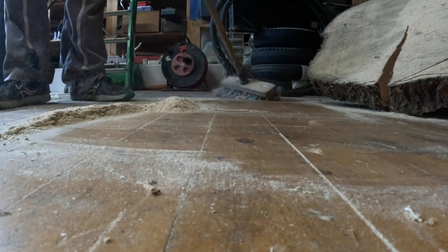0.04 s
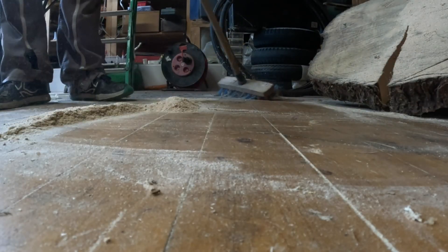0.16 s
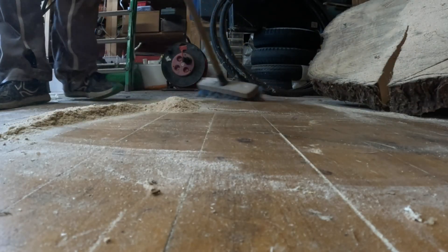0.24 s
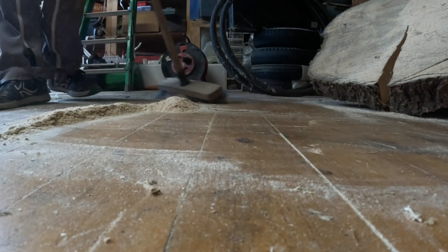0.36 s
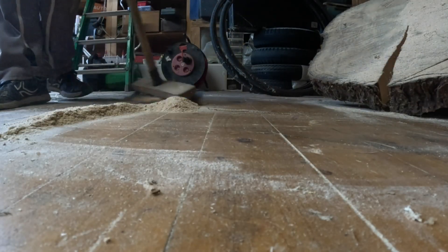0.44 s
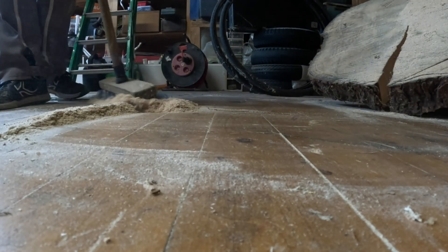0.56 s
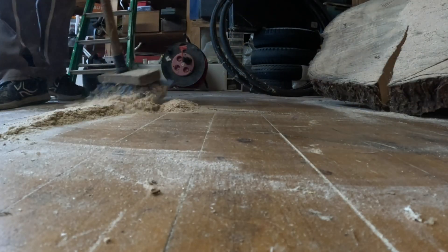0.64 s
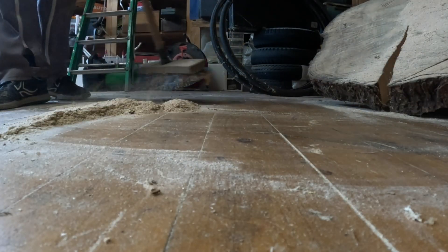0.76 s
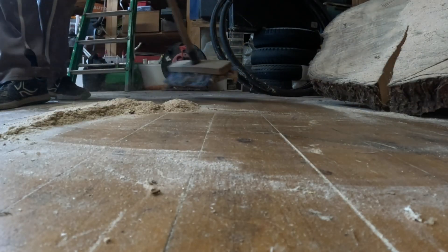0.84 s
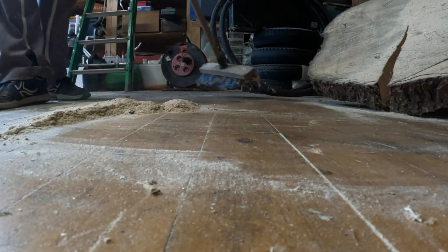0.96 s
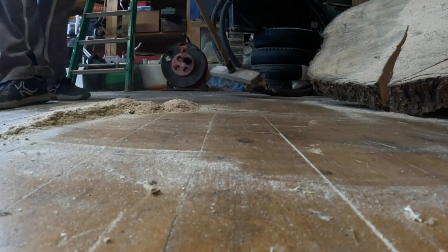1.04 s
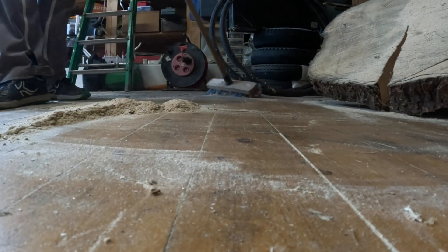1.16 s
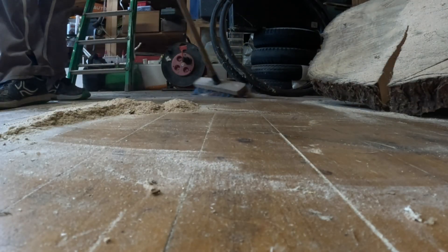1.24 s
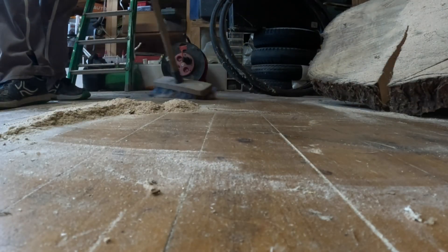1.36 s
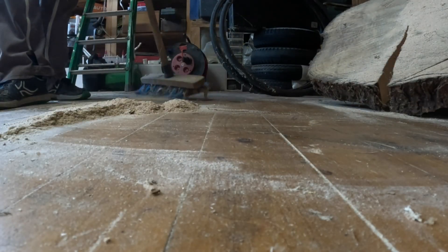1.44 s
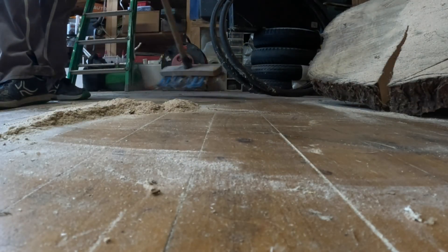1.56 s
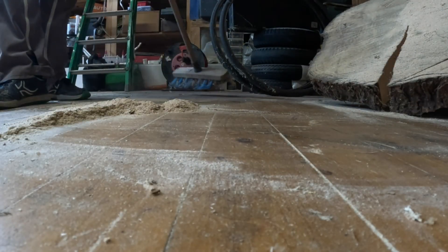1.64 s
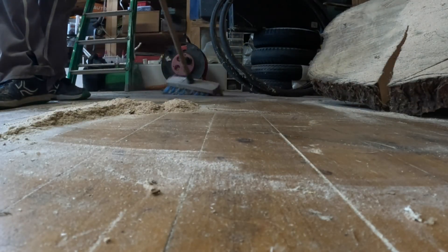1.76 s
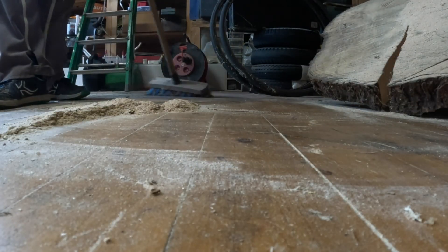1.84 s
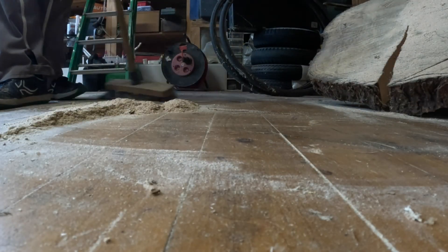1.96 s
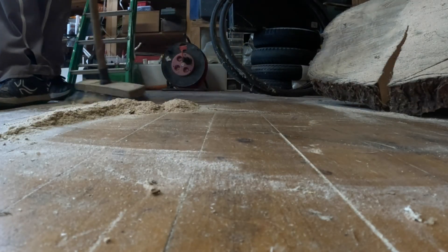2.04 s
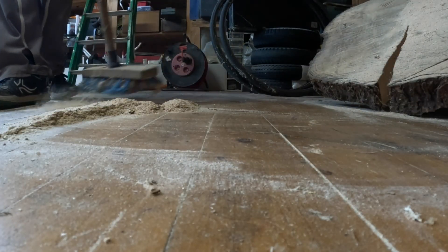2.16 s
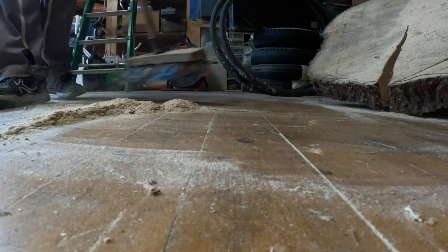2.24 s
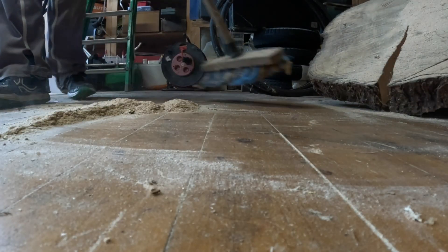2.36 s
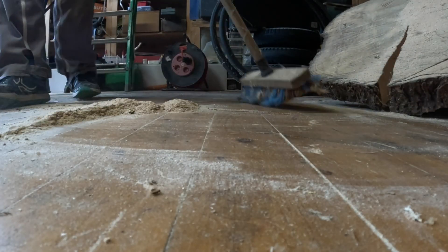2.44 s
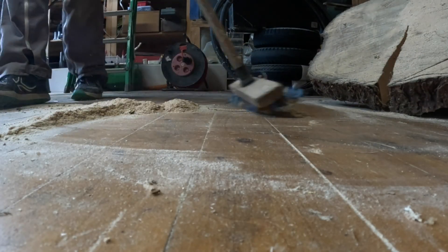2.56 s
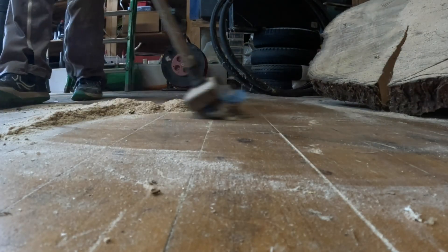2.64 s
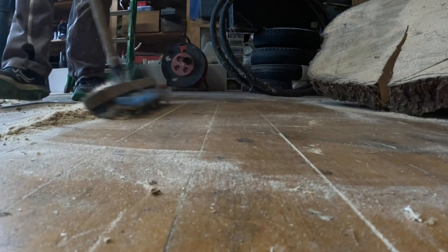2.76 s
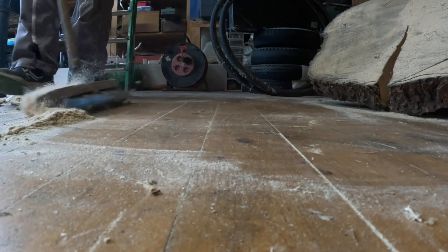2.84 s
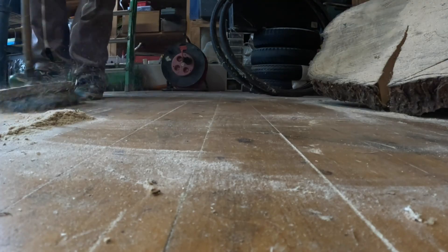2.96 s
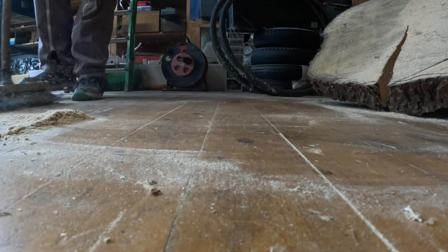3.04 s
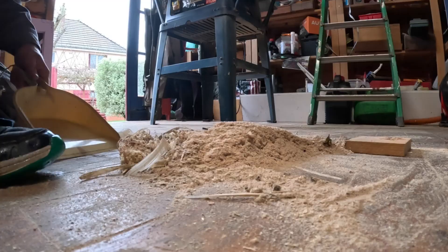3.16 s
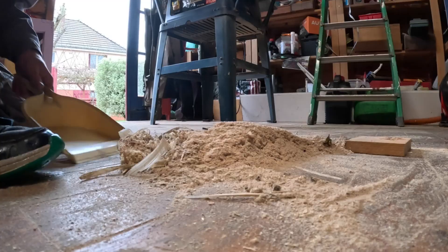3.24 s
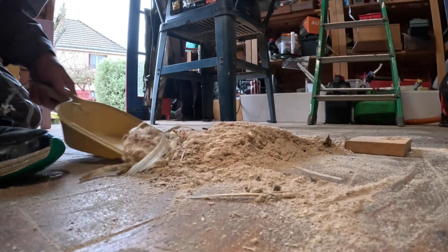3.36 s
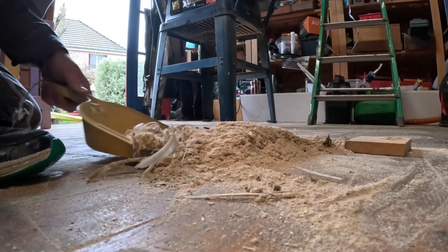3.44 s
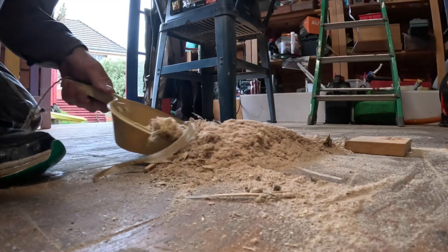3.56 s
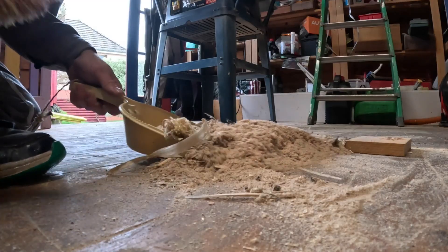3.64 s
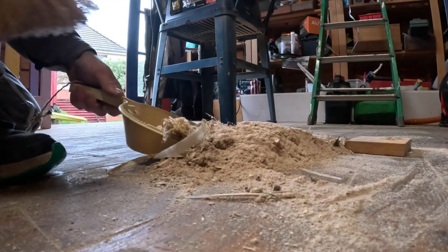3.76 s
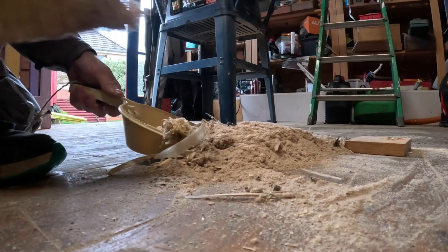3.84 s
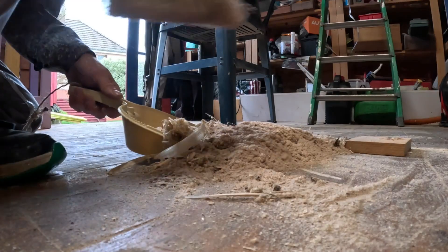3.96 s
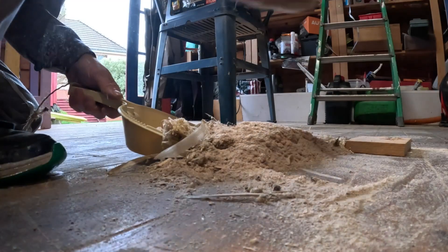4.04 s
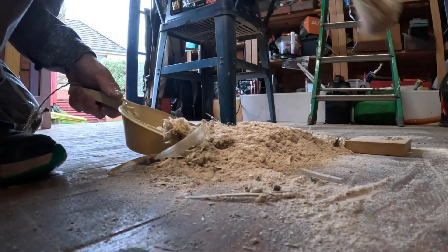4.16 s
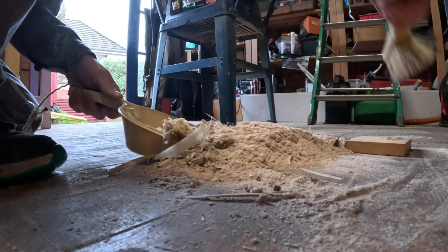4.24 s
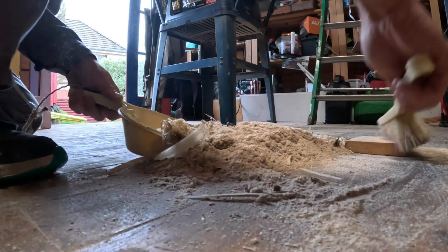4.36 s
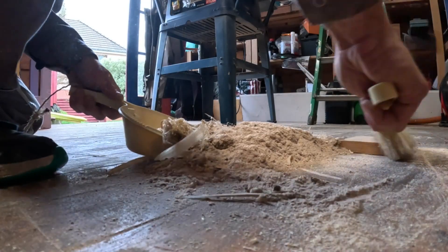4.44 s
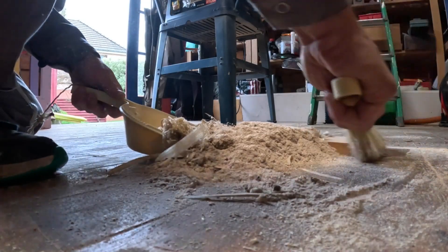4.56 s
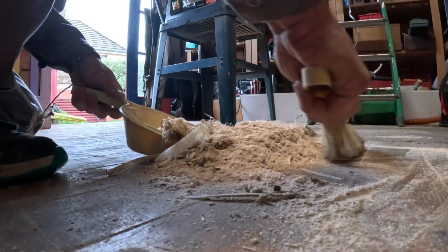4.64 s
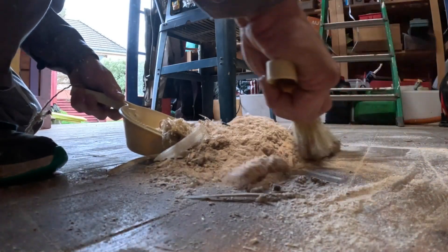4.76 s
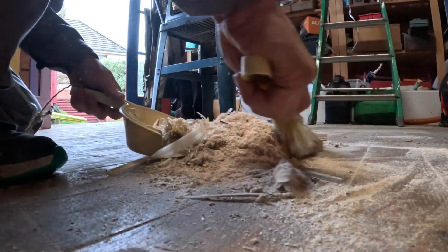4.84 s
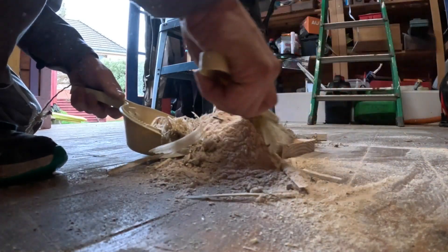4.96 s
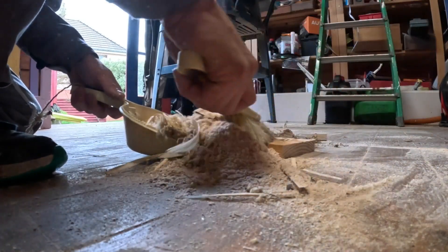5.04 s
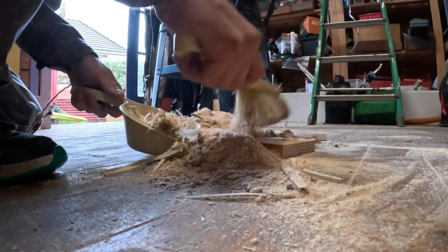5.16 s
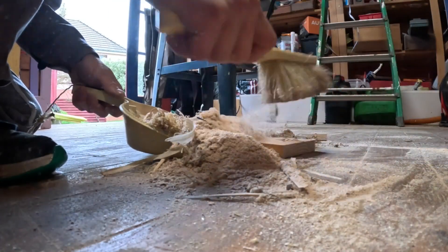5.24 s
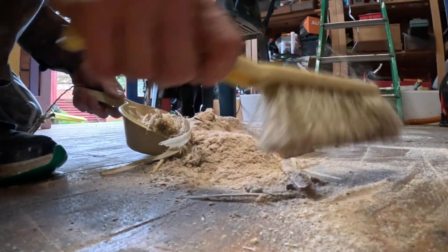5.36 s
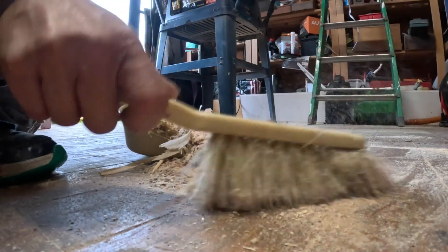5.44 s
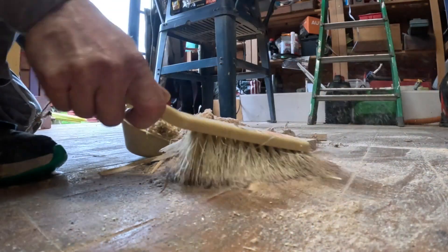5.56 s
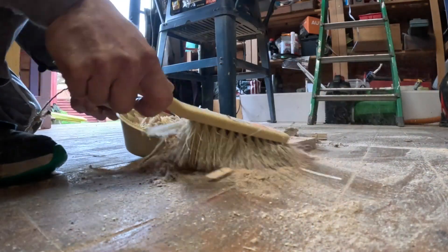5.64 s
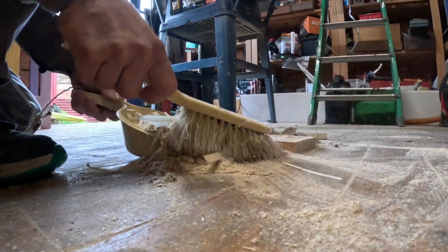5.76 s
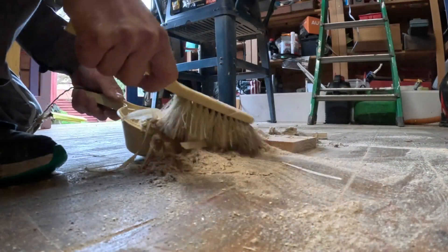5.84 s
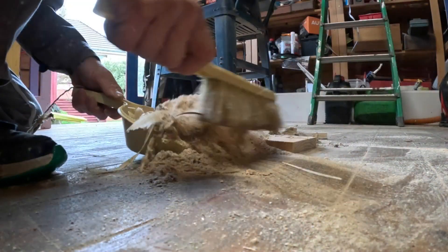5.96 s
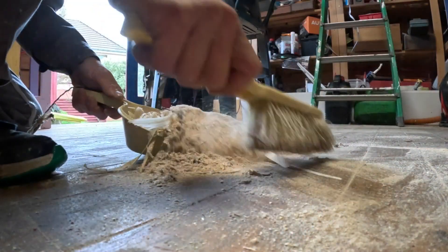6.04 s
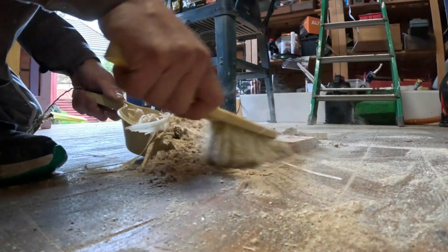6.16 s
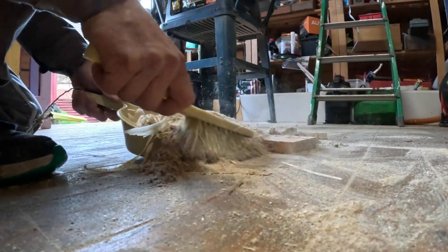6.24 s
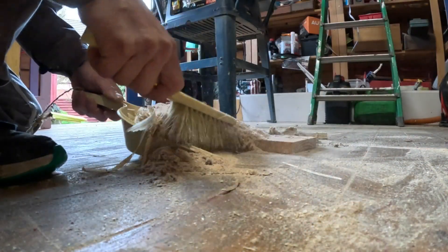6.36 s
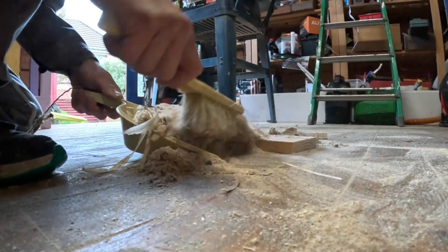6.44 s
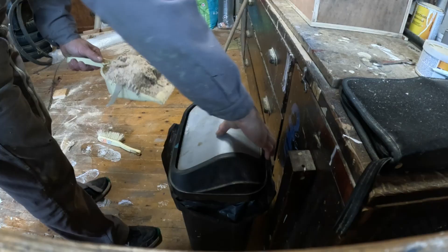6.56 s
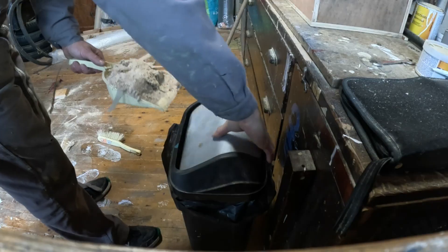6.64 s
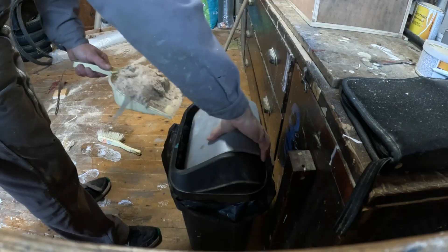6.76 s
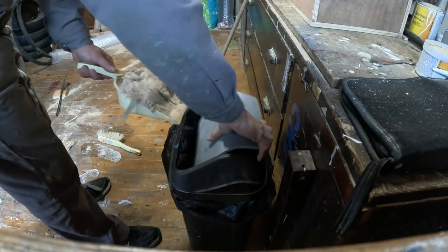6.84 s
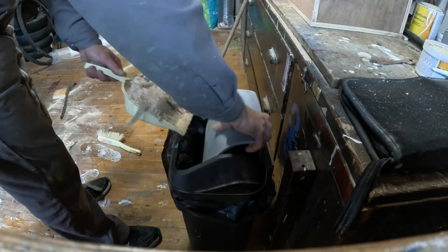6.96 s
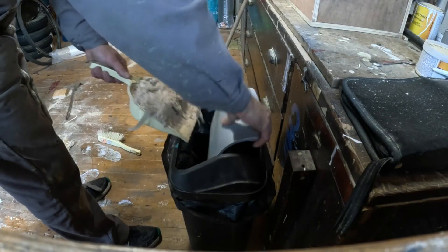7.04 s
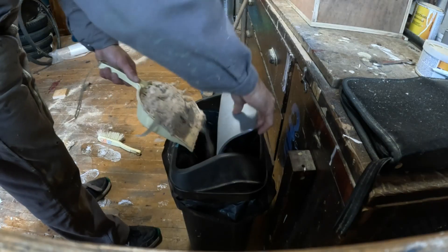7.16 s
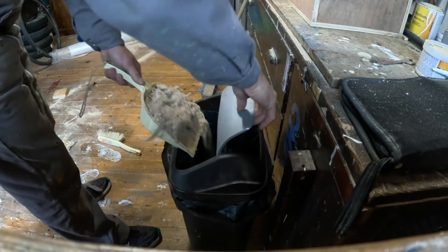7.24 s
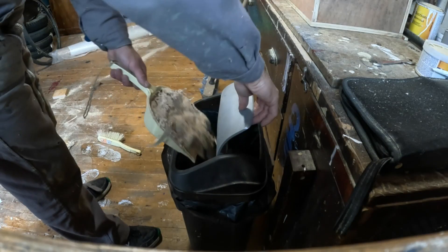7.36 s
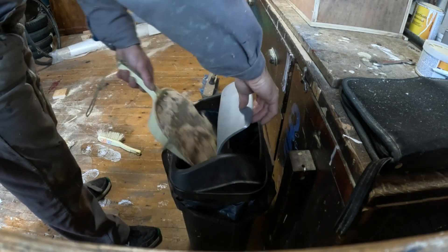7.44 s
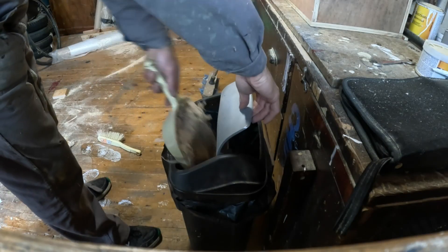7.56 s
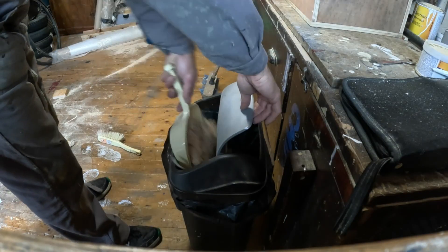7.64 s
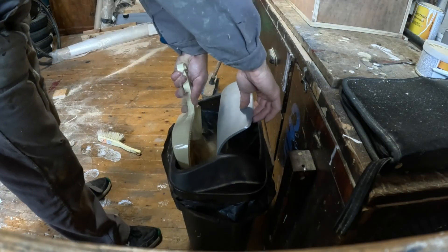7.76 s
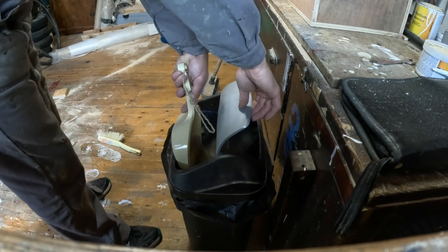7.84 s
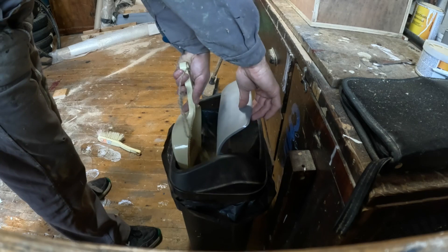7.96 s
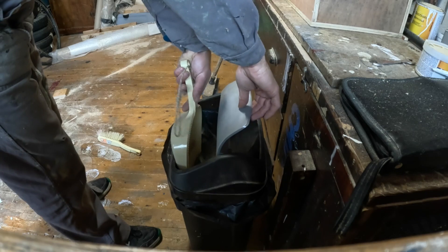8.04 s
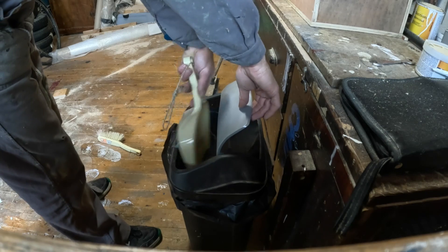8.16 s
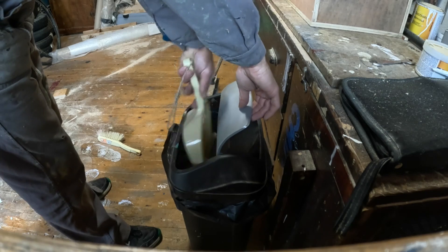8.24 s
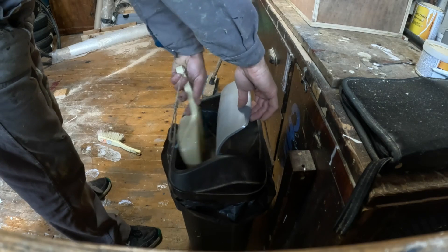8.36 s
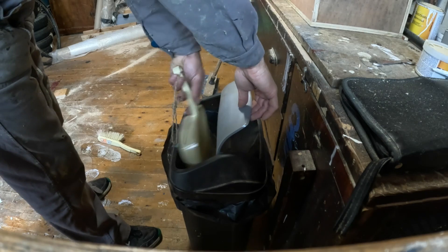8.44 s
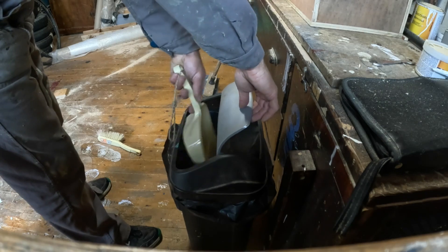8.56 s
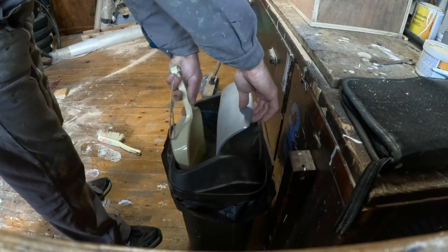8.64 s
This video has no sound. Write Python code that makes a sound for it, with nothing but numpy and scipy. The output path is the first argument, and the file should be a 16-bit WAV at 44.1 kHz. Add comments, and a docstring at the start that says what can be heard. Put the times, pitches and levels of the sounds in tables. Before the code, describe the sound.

Close to the floor in a small workshop, a stiff broom makes gritty swishing strokes with wooden catches and soft thuds. A plastic dustpan scrapes up loudly, squeaking and knocking the boards. A hand brush swishes sawdust in, shoving a juddering wood block. Brushing stops abruptly; a lid rubs and bumps, sawdust rustles into a lined bin, and the pan is rapped twice on the rim.

```python
"""A broom sweeps sawdust over workshop floorboards in four strokes, close to a microphone at floor level.
Then a plastic dustpan scrapes up to the heap and a hand brush fills it, shoving a wooden offcut along.
Brushing stops dead; a bin lid swings open, the sawdust slides in, and the pan is rapped twice on the rim.
Rubbing is noise made of tiny random slips and a blow is a push with dying chatter; each rings a filter
shaped like the thing touched, in one small room. The floor trembles and a steady background lies below."""
import sys
import numpy as np
from scipy import signal
from scipy.fft import rfft, irfft, next_fast_len
from scipy.io import wavfile
from scipy.ndimage import uniform_filter1d, minimum_filter1d

SR = 44100
rng = np.random.default_rng(int(sys.argv[2]) if len(sys.argv) > 2 else 0)


def file_out(sig):
    """Save sig as 16-bit WAV at sys.argv[1]."""
    # one column per channel
    cols = np.atleast_2d(sig).T
    # limit, then scale
    lim = np.clip(cols, -1, 1)
    pcm = np.round(lim * 32767).astype(np.int16)
    wavfile.write(sys.argv[1], SR, pcm)


N = 383475  # length in samples

# All levels in the tables are relative: each layer has a further gain where it is mixed.
# A movement speeds up (rise), carries on as its pressure changes (hold) and slows to rest (fall).

# broom strokes: t/s, rise/s, hold/s, fall/s, bristle level/dB, grit level/dB, head judder level/dB
BROOM_STROKES = [(0.0, 0.00057, 0.27, 0.16, -22.5, -16, -21), (0.945, 0.0054, 0.0055, 0.021, -34, -22, -28),
                 (0.93, 0.17, 0.041, 0.079, -22.5, -18.5, -27.5),
                 (1.52, 0.17, 0.13, 0.079, -22, -18.5, -29), (2.285, 0.16, 0.16, 0.21, -19, -16, -23),
                 (2.755, 0.012, 0.0058, 0.08, -28, -29, -23.5)]
# broom head catching on a board: t/s, grit level/dB, head level/dB, bristle level/dB (peaks)
BROOM_CATCHES = [(.088, -10, -7.5, -12.5), (.305, -11, -16.5, -17.5), (.962, -22, -19, -26),
                 (1.09, -11, -24, -19), (1.137, -25, -5.5, -25), (2.443, -4, -10.5, -13),
                 (2.513, -11, -10, -15), (2.642, -5.5, -10.5, -14), (2.785, -14, -29, -21.5)]
# spectrum of the bristle tips: f/Hz, level/dB
BRISTLE_TIPS = [(1120, -8), (1900, -0.5), (2640, -4.5), (3510, -1.5), (5460, -3.5), (7010, -2),
                (9490, -11.5), (11000, -21), (12500, -18.5), (14000, -31), (15000, -39)]
# spectrum of grit rolling under them: f/Hz, level/dB
GRIT = [(350, -12.5), (600, -8), (783, -7.5), (958, 2.5), (1120, -3.5), (1280, -4), (1700, -4.5),
        (2200, -26), (2860, -25), (4840, -120)]
# spectrum of the wooden head: f/Hz, level/dB
BROOM_HEAD = [(71, -19.5), (120, -1), (215, -6), (252, -6), (290, -7.5), (456, -10), (750, -13), (980, -38),
              (1650, -120)]
# resonances of the head: f/Hz, width/Hz, level over the spectrum/dB
HEAD_MODES = [(240, 36, -1), (335, 30, -3)]
# spectrum of stiff bristles springing: f/Hz, level/dB
STIFF_BRISTLES = [(800, -3.5), (1800, 4), (2600, 5), (4000, -4.5), (7000, -5.5), (10000, -23), (15000, -24)]
BEND_DB = 1.2  # how far the colour of the broom wanders as the bristles bend


def broom():
    """Thousands of bristles flick over the boards, rolling grit and shaking the wooden head."""
    tips, grit, head = body(BRISTLE_TIPS), body(GRIT), body(BROOM_HEAD, HEAD_MODES)
    hiss = rub(BROOM_STROKES, tips, per_s=5000, spread_db=-1.5, hiss=1.0, chatter_db=3.5, wet_db=4.5,
               left_db=3.5, sag_db_per_s=6.5, follow=0.82, cycles=1.0)
    crackle = rub(BROOM_STROKES, tips, per_s=500, spread_db=2.5, hiss=0, chatter_db=3, wet_db=-4,
                  left_db=2, sag_db_per_s=8, cycles=3)
    rolling = rub(BROOM_STROKES, grit, per_s=1000, spread_db=0.0, hiss=0.28, chatter_db=5.5, wet_db=5.0,
                  left_db=-1.0, sag_db_per_s=21.0, follow=0.76, level_column=5)
    judder = rub(BROOM_STROKES, head, per_s=400, spread_db=1.5, hiss=0.046, chatter_db=1.5, wet_db=3.5,
                 sag_db_per_s=13, follow=0.65, level_column=6)
    sweeping = amp(-2.0) * hiss + amp(-10) * crackle + amp(-4.5) * rolling + amp(-1.0) * judder
    grit_catch = strike(BROOM_CATCHES, grit, contact_s=.016, rattle=5, wet_db=-5)
    head_catch = strike(BROOM_CATCHES, head, contact_s=0.032, rattle=2.26, wet_db=-7.5, level_column=2)
    bristle_catch = strike(BROOM_CATCHES, body(STIFF_BRISTLES), contact_s=.016, rattle=8, wet_db=-3,
                           level_column=3)
    catches = amp(-3.5) * grit_catch + amp(-1.0) * head_catch + bristle_catch
    return wander(sweeping, BEND_DB) + catches


# broom and brush bristles touching down and flicking: t/s, rise/s, hold/s, fall/s, level/dB
FLICKS = [(.874, .012, .012, .06, -32.5), (1.5, .014, .004, .02, -38), (1.53, .02, .012, .034, -36.5),
          (2.27, .003, .0067, .1, -33), (2.311, .002, .004, .03, -30), (5.15, .021, .025, .025, -39),
          (5.92, .003, .004, .013, -32)]


def flicks():
    """Tufts of stiff bristles catch on the floor and spring free."""
    return rub(FLICKS, body(STIFF_BRISTLES), per_s=2900, spread_db=5, hiss=1.0, chatter_db=-1.5, wet_db=-1,
               left_db=0.5, sag_db_per_s=62, cycles=0.95)


# pushes of the dustpan: t/s, rise/s, hold/s, fall/s, lip scrape level/dB, board judder level/dB
PAN_PUSHES = [(3.249, 0.0023, 0.014, 0.026, -29, -54), (3.282, 0.0077, 0.036, 0.024, -14.5, -21),
              (3.322, 0.027, 0.091, 0.25, -8.5, -14), (3.565, 0.021, 0.11, 0.067, -17, -25)]
# light knocks of dustpan, offcut and brush handle: t/s, peak level/dB
CLACKS = [(3.25, -24), (3.291, -16), (3.434, 13.5), (3.482, -2), (3.5, 5.5), (3.519, 9), (3.584, 2),
          (3.706, -10), (3.877, -18), (4.548, -15), (4.599, -21), (4.701, -7), (4.831, -2), (5.502, -8),
          (5.685, -10), (5.898, -15), (6.096, -7), (6.158, -7.5), (6.197, -6.5), (6.457, -19)]
# spectrum of the plastic lip on the floor: f/Hz, level/dB
PAN_LIP = [(350, -17), (600, -13.5), (697, 1), (757, -12), (917, -2), (996, -3.5), (1420, -0.5),
           (2000, -10.5), (3060, -18), (4310, -23.5), (5660, -25), (11100, -47), (12500, -38), (15800, -91)]
# resonances of the pan: f/Hz, width/Hz, level over the spectrum/dB
PAN_MODES = [(552, 15, 3), (1080, 22, -7), (1377, 18, 1.5), (1530, 20, -4), (3050, 110, 4)]
# spectrum of grit crushed under the lip: f/Hz, level/dB
CRUSHED_GRIT = [(800, -10), (1800, 4), (3000, 4), (4400, -5.5), (5600, -10), (7500, -17), (10000, -22),
                (15000, -42)]
# spectrum of the floorboards: f/Hz, level/dB
BOARDS = [(40, -31), (100, -15), (155, -6), (200, -0.5), (245, 4), (330, -3), (480, -2), (650, -13),
          (1000, -15), (3000, -64), (10000, -100)]
# resonance of the floorboards: f/Hz, width/Hz, level over the spectrum/dB
BOARD_MODES = [(236.6, 18, 9)]
# spectrum of a light hard knock: f/Hz, level/dB
CLACK = [(100, -1.5), (300, 6.5), (700, -2.5), (1500, -2), (3000, -16), (6000, -20.5), (15000, -47)]


def dustpan():
    """The plastic lip chatters over the floor, crushing grit, ringing the pan and drumming the boards."""
    lip = rub(PAN_PUSHES, body(PAN_LIP, PAN_MODES), per_s=2400, spread_db=2, hiss=.25, chatter_db=1.8,
              wet_db=-8, left_db=1.3, sag_db_per_s=20, cycles=1.8)
    crunch = rub(PAN_PUSHES, body(CRUSHED_GRIT), per_s=600, spread_db=1.5, hiss=.1, chatter_db=2,
                 wet_db=-7, left_db=1.3, sag_db_per_s=30, cycles=2.5)
    drum = rub(PAN_PUSHES, body(BOARDS, BOARD_MODES), per_s=220, spread_db=3.0, hiss=0.055, chatter_db=-5.5,
               wet_db=-25.0, sag_db_per_s=23, follow=0.4, level_column=5)
    clacks = strike(CLACKS, body(CLACK, PAN_MODES), contact_s=.004, rattle=4, wet_db=-6)
    return amp(-2.5) * lip + amp(-13) * crunch + amp(-0.5) * drum + amp(-7.0) * clacks


# the lip squealing: t/s, length/s, first f/Hz, last f/Hz, level/dB
SQUEALS = [(3.274, 0.047, 1437, 1510, -15.5), (3.312, .04, 1548, 1394, -8),
           (3.345, 0.049, 1393, 1336, -10.5), (3.379, 0.038, 1380, 1526, -10),
           (3.642, 0.029, 1420, 1560, -27)]


def pan_squeals():
    """Slips of the lip lock loosely onto a gliding pitch with overtones, and the pan squeals."""
    out = np.zeros((2, N))
    for s, length, first_hz, last_hz, db in SQUEALS:
        t = np.arange(round(length * SR)) / SR
        wobble = 0.021 * unit(uniform_filter1d(rng.standard_normal(len(t)), 150))
        glide_hz = np.linspace(first_hz, last_hz, len(t)) * (1 + wobble)
        phase = 2 * np.pi * np.cumsum(glide_hz) / SR
        overtones = np.sin(np.outer(np.arange(2, 5), phase)).sum(0)
        squeal = amp(db) * np.hanning(len(t)) * (np.sin(phase) + amp(-17.5) * overtones)
        add(out, s, room(squeal, np.ones(1), wet_db=-21))
    return out


# hand brush strokes: t/s, rise/s, hold/s, fall/s, level/dB
BRUSH_STROKES = [(3.84, 0.088, 0.038, 0.05, -47), (4.21, 0.087, 0.21, 0.045, -49.5),
                 (4.43, 0.0032, 0.0031, 0.012, -27.5), (4.49, 0.091, 0.57, 0.057, -36),
                 (5.51, 0.093, 0.046, 0.28, -29), (5.672, 0.0056, 0.013, 0.021, -28),
                 (5.86, 0.011, .02, 0.68, -44), (6.19, 0.029, 0.041, 0.2, -35.5),
                 (6.32, 0.076, 0.24, .06, -48)]
# shavings and splinters pushed into the pan: t/s, rise/s, hold/s, fall/s, level/dB
SHAVINGS = [(5.05, 0.068, 0.035, 0.035, -31.5), (5.53, 0.07, 0.037, 0.18, -24.5),
            (5.8, 0.049, 0.11, 0.023, -29), (6.158, 0.0024, 0.0041, 0.019, -29),
            (6.185, 0.025, .01, 0.36, -32), (6.28, 0.061, 0.032, 0.056, -19), (6.4, .02, 0.032, 0.1, -50),
            (6.51, 0.022, 0.053, 0.02, -29)]
# chips of wood snapping: t/s, peak level/dB
SNAPS = [(3.2505, -27), (3.3212, -11), (3.5199, 7), (4.8307, -8), (5.686, -10), (5.712, -17), (6.095, -17),
         (6.164, -10), (6.457, -9.5), (6.985, -23), (7.007, -23), (7.7488, -17), (7.821, -23)]
# hard grains ticking off pan and bristles: t/s, peak level/dB
TICKS = [(2.048, -29), (3.3229, -5.5), (4.4318, -23), (4.944, -19.5), (5.0697, -21), (5.7492, -25),
         (5.779, -16.5), (5.812, -18.5), (6.5134, -39)]
# spectrum of the soft bristles: f/Hz, level/dB
SOFT_BRISTLES = [(1180, -51), (2000, -10), (2710, -6.5), (3080, -2.5), (4750, -8), (7510, -5), (8860, -8),
                 (14100, -22.5), (15000, -31), (15800, -47)]
# spectrum of splinters rasping: f/Hz, level/dB
SPLINTERS = [(290, -58), (500, -8), (638, -16), (873, -10), (991, -6), (1210, -4.5), (1610, -9),
             (1970, -10), (2340, -12.5), (5390, -25), (8000, -35), (10400, -63), (17600, -120)]
# spectrum of a snapping chip: f/Hz, level/dB
CHIP = [(500, 16.5), (1800, 16.5), (3200, 12.5), (6500, -1), (10000, -10), (15000, -46)]
# spectrum of a ticking grain: f/Hz, level/dB
HARD_GRAIN = [(1200, -25), (3000, 4), (6000, 4.5), (9500, 2), (15000, -35)]


def hand_brush():
    """Soft bristles hiss through the heap and flick grains; shavings rasp into the pan and dry chips snap."""
    swish = rub(BRUSH_STROKES, body(SOFT_BRISTLES), per_s=3500, spread_db=2.5, hiss=.7, chatter_db=2.5,
                wet_db=-3, left_db=1.3, sag_db_per_s=14, follow=0.89, cycles=1.5)
    rasp = rub(SHAVINGS, body(SPLINTERS), per_s=3600, spread_db=1.8, hiss=.5, chatter_db=1.5,
               wet_db=-3, sag_db_per_s=8, cycles=2)
    snaps = strike(SNAPS, body(CHIP), contact_s=0.0016, rattle=1.5, wet_db=-4)
    ticks = strike(TICKS, body(HARD_GRAIN), contact_s=.002, rattle=3, wet_db=-8)
    return amp(-2.5) * swish + amp(-6.5) * rasp + amp(-3.5) * snaps + amp(-1) * ticks


# shoves of the offcut: t/s, rise/s, hold/s, fall/s, scrape level/dB, board judder level/dB
OFFCUT_SHOVES = [(4.51, 0.11, 0.13, 0.17, -17, -6), (4.82, 0.056, 0.1, 0.02, -19.5, -7.5),
                 (4.98, 0.02, 0.037, 0.078, -35.5, -26), (5.65, 0.034, 0.0071, 0.14, -26.5, -15)]
# the offcut jolting as it sticks and lets go: t/s, peak level/dB
JOLTS = [(4.436, -13), (4.463, -15), (4.547, 1.5), (4.561, -1.5), (4.601, 5), (4.612, 5), (4.622, 0),
         (4.661, -5), (4.702, -1), (4.712, -2), (4.816, -15), (4.853, -10), (4.875, -8.5), (4.928, -10.5),
         (4.968, -16), (5.712, -11)]
# spectrum of its scraping edge: f/Hz, level/dB
OFFCUT_EDGE = [(310, -30), (520, 0.5), (591, 1.5), (713, -11.5), (772, -8), (1040, -6.5), (1510, -12.5),
               (1840, -12), (2260, -20), (3040, -17), (3360, -26), (3930, -20.5), (5500, -30.5),
               (7150, -30), (12100, -120)]
# resonances of the sliding block: f/Hz, width/Hz, level over the spectrum/dB
OFFCUT_MODES = [(851, 120, 0), (1330, 90, -3), (1800, 160, -1), (2980, 160, 2)]
# spectrum of the judder under the block: f/Hz, level/dB
OFFCUT_BODY = [(40, -26), (100, -11), (170, 3.5), (235, 1.5), (310, -6), (420, -2), (530, -8.5),
               (680, -16.5), (850, -16), (1100, -27), (3000, -46), (10000, -100)]
# spectrum of the boards when the block jolts: f/Hz, level/dB
OFFCUT_JOLT = [(40, -33), (110, -18), (180, 0), (255, 10), (320, -5), (450, -3.5), (600, -8.5), (800, -15),
               (1050, -11.5), (2000, -41), (8000, -76)]
# resonance of the boards under the block: f/Hz, width/Hz, level over the spectrum/dB
JOLT_MODES = [(245, 32, 7)]


def offcut():
    """A block of wood sticks and slips on the boards ahead of the brush."""
    scrape = rub(OFFCUT_SHOVES, body(OFFCUT_EDGE, OFFCUT_MODES), per_s=2600, spread_db=2, hiss=.4,
                 chatter_db=1.8, wet_db=-7, left_db=-.8, sag_db_per_s=10, cycles=1)
    judder = rub(OFFCUT_SHOVES, body(OFFCUT_BODY), per_s=900, spread_db=1, hiss=.25, chatter_db=1,
                 wet_db=-7, sag_db_per_s=18, level_column=5)
    jolts = strike(JOLTS, body(OFFCUT_JOLT, JOLT_MODES), contact_s=.005, rattle=.4, wet_db=-10)
    return amp(-6.0) * scrape + amp(-5) * judder + amp(-1) * jolts


# sawdust sliding into the liner: t/s, rise/s, hold/s, fall/s, rustle level/dB, patter level/dB
POUR = [(7.48, 0.043, 0.022, 0.12, -45.5, -34.5), (7.572, 0.0061, 0.022, 0.1, -44, -29),
        (7.65, 0.062, 0.05, 0.91, -36.5, -39), (7.88, 0.083, 0.014, 0.12, -35, -34),
        (8.07, 0.03, 0.072, 0.6, -52.5, -48)]
# clumps landing in the liner: t/s, peak level/dB
CLUMPS = [(7.674, -18.5), (7.699, -18.5), (7.715, -18), (7.735, -23.5), (7.812, -23), (7.896, -27),
          (7.972, -19)]
# spectrum of the rustling liner: f/Hz, level/dB
LINER = [(380, -28), (650, -16), (816, -5.5), (1250, -8.5), (1390, -8), (2220, -13), (6640, -17.5),
         (7590, -15.5), (10200, -28), (14000, -32), (15800, -56)]
# spectrum of the liner crinkling: f/Hz, level/dB
CRINKLE = [(700, -14), (1500, -4), (2800, 4), (4500, -1), (6200, -12), (7600, -2), (10000, -17),
           (15000, -33)]
# spectrum of the hollow bin bottom: f/Hz, level/dB
BIN_BOTTOM = [(65, -40), (110, -9), (194, -2.5), (269, -5), (350, -19), (381, -12), (471, -17), (720, -16),
              (1100, -27), (1430, -35), (2420, -120)]
# spectrum of a landing clump: f/Hz, level/dB
CLUMP = [(150, -8), (400, 2), (1400, -3.5), (3000, -10), (8000, -27), (15000, -46)]
# resonances of the bin: f/Hz, width/Hz, level over the spectrum/dB
BIN_MODES = [(233, 22, -3), (350, 10, 2), (647, 9, 4), (700, 11, 3), (780, 8, 6), (964, 11, 3),
             (1055, 9, 4), (1165, 11, 7), (1370, 12, 8), (1570, 8, 9), (1663, 9, 9), (2054, 70, 3),
             (2530, 18, 5), (3520, 18, 4)]


def sawdust_pour():
    """Sawdust slides into the crinkling liner, patters on the hollow bottom and lands in clumps."""
    rustle = rub(POUR, body(LINER), per_s=2400, spread_db=2.2, hiss=0.6, chatter_db=2.5,
                 wet_db=-2, sag_db_per_s=12, cycles=1.5)
    crinkle = rub(POUR, body(CRINKLE), per_s=600, spread_db=2.2, hiss=.25, chatter_db=3,
                  wet_db=-4, sag_db_per_s=10, cycles=2)
    patter = rub(POUR, body(BIN_BOTTOM), per_s=360, spread_db=2.0, hiss=0.32, chatter_db=3.5,
                 wet_db=-18.0, sag_db_per_s=14, level_column=5)
    clumps = strike(CLUMPS, body(CLUMP, BIN_MODES), contact_s=.014, rattle=8, wet_db=-3)
    return amp(-1.0) * rustle + amp(-7) * crinkle + amp(2.0) * patter + clumps


# two raps of the pan on the rim, with rebounds and rattle: t/s, pan peak level/dB, bin wall peak level/dB
RAPS = [(8.392, -1, -14), (8.397, -1, 3), (8.403, -7, 0), (8.416, -12, -11), (8.433, -13, -9),
        (8.452, -20, -13), (8.5575, 3, -10), (8.5645, 0, 4), (8.572, -7, -1), (8.587, -12, -9),
        (8.597, -11, -7), (8.61, -11, -9), (8.624, -15, -10), (8.648, -19, -18)]
# spectrum of the rapped pan: f/Hz, level/dB
RAP = [(40, -20), (70, -17), (120, -3.5), (190, -1.5), (330, -7), (520, -12.5), (800, -1), (1100, -5.5),
       (1350, -11.5), (2100, -10.5), (3200, -16.5), (5500, -24.5), (8000, -27), (16000, -55)]
# spectrum of the struck bin wall: f/Hz, level/dB
BIN_WALL = [(50, -20), (100, -13), (150, -1.5), (215, 4), (300, -2), (430, -6.5), (560, -15.5), (780, -6.5),
            (1100, -12), (2000, -29), (8000, -61)]


def rim_raps():
    """Each contact with the rim cracks, rings pan and bin, and thumps the bin wall."""
    wall = strike(RAPS, body(BIN_WALL), contact_s=.005, rattle=.4, wet_db=-6, level_column=2)
    ring = strike(RAPS, body(RAP, BIN_MODES), contact_s=.004, rattle=3, wet_db=-3)
    crack = strike(RAPS, body(CHIP), contact_s=.004, rattle=6, wet_db=-9)
    return crack + amp(0.5) * ring + wall


# the lid rubbing as it swings: t/s, rise/s, hold/s, fall/s, level/dB
LID_SWINGS = [(6.86, 0.026, 0.022, 0.18, -38.5), (6.974, 0.02, 0.02, 0.03, -25.5)]
# lid and pan bumping the bin: t/s, hollow thump peak level/dB, contact peak level/dB
BIN_BUMPS = [(6.775, -19, -38), (7.4825, -13.5, -20.5), (7.578, -9.5, -16.5)]
# spectrum of the rubbing lid: f/Hz, level/dB
LID_RUB = [(240, -46), (400, -16), (613, -5.5), (712, -6), (926, -13), (1060, -0.5), (1380, -14),
           (1590, -6.5), (2260, -12), (2460, -10), (3200, -19), (3970, -21.5), (8000, -34), (10400, -62),
           (17600, -120)]
# spectrum of the bright tick on the rim: f/Hz, level/dB
RIM_TICK = [(900, -3), (2200, 8), (3700, 1), (5000, -33), (15000, -55)]


def bin_lid():
    """The lid rubs as it swings; lid and pan bump the hollow bin with a knock and a bright tick."""
    swing = rub(LID_SWINGS, body(LID_RUB), per_s=530, spread_db=3.0, hiss=1.0, chatter_db=0.0, wet_db=-9.0)
    thump = strike(BIN_BUMPS, body(BIN_BOTTOM), contact_s=0.015, rattle=.8, wet_db=-4)
    knock = strike(BIN_BUMPS, body(CLACK, BIN_MODES), contact_s=0.0025, rattle=1.33, wet_db=6.5,
                   level_column=2)
    tick = strike(BIN_BUMPS, body(RIM_TICK), contact_s=.003, rattle=4, wet_db=-6, level_column=2)
    return amp(0.3) * swing + amp(-2.0) * thump + amp(5.0) * knock + amp(4) * tick


# a sleeve rustling: t/s, rise/s, hold/s, fall/s, level/dB
SLEEVE_MOVES = [(6.66, 0.12, 0.046, .2, -43), (6.975, 0.0085, 0.17, 0.25, -38.5)]
# spectrum of the cloth: f/Hz, level/dB
CLOTH = [(1180, -6.5), (2000, -10.5), (2400, -10), (2750, -5), (4100, -5.5), (5700, -17), (7640, -13),
         (12400, -30.5), (15800, -35)]


def sleeve():
    """Cloth rubs on itself, its pressure growing through each movement."""
    return amp(-2.0) * rub(SLEEVE_MOVES, body(CLOTH), per_s=1100, spread_db=2.0, hiss=0.86, chatter_db=0.0,
                           wet_db=-7.0, sag_db_per_s=-14.5)


# the floor trembling under shifting weight: t/s, rise/s, hold/s, fall/s, level/dB
RUMBLE = [(0.0, 0.0091, 1.32, 0.057, -24.5), (0.02, 0.094, 0.018, 0.11, -19),
          (1.14, 0.025, 0.043, 0.045, -26), (1.35, 0.2, 1.524, .07, -24), (2.4, 0.066, 0.12, .08, -13),
          (4.53, 0.1, 0.43, .1, -42), (5.293, 0.056, 0.3, 0.23, -27.5), (6.14, 0.026, .02, 0.12, -30),
          (6.68, 0.063, 2, .05, -34), (7.163, 0.042, 0.057, 0.077, -35), (7.76, 0.065, 0.036, .2, -28),
          (8.388, 0.031, 0.048, 0.15, -25), (8.553, 0.026, 0.037, .08, -20)]
# feet, knees and broom head thudding on the floor: t/s, peak level/dB
THUDS = [(0.053, -5), (0.083, -2.5), (0.127, -4.5), (0.206, -4.5), (0.425, -8.5), (0.456, -3),
         (0.548, -7.5), (0.609, -8), (1.133, -22), (2.518, -22), (2.61, -4.5), (2.902, -15), (5.33, -16),
         (5.365, -27), (5.409, -15), (5.504, -10), (5.654, -14)]
# broom and dustpan setting the boards booming: t/s, peak level/dB
BUMPS = [(2.447, -7), (2.516, -4.5), (2.575, -10), (2.644, -13), (3.345, -5), (3.362, -2), (3.429, 5.5),
         (3.443, 6.5), (3.468, 1.5), (3.519, 1.5), (3.583, 0.5), (3.601, 1), (3.628, 0)]
# spectrum of the swaying floor: f/Hz, level/dB
FLOOR_SWAY = [(12, -8), (28, 2.5), (45, 0.5), (60, 3.5), (85, -10), (140, -18), (300, -67), (3000, -120)]
# spectrum of a thud: f/Hz, level/dB
FOOTFALL = [(25, -17), (60, 1.5), (115, 8), (180, -6), (300, -14), (700, -34.5), (2000, -98), (8000, -120)]


def floorboards():
    """The floor sways under shifting weight, thuds under feet and booms where something catches on it."""
    sway = rub(RUMBLE, body(FLOOR_SWAY), per_s=400, spread_db=3.0, hiss=1, chatter_db=0,
               wet_db=-1, sag_db_per_s=.6)
    thuds = strike(THUDS, body(FOOTFALL), contact_s=0.045, rattle=0.91, wet_db=-4.0)
    bumps = strike(BUMPS, body(BOARDS, BOARD_MODES), contact_s=.004, rattle=.35, wet_db=-8)
    return amp(0.5) * sway + amp(-4.0) * thuds + amp(-5.5) * bumps


# a faint hiss under the broom strokes: t/s, rise/s, hold/s, fall/s, level/dB
FAINT_HISS = [(0.0, .01, 2.7, .1, -35)]
# spectrum of that hiss: f/Hz, level/dB
FAINT_HISS_COLOUR = [(200, -1.5), (500, -7.5), (1000, -5.5), (1800, -10), (2800, -18), (4500, -19.5),
                     (7000, -19), (9000, -31.5), (12000, -42), (16000, -81)]


def faint_hiss():
    """A dense, diffuse hiss hangs on between the broom strokes."""
    return rub(FAINT_HISS, body(FAINT_HISS_COLOUR), per_s=12000, spread_db=8.0, hiss=3.8, chatter_db=1.5,
               wet_db=14.5, sag_db_per_s=1.8)


# when the workshop background switches: t/s
CUTS = [3.2, 6.595]
# spectra of the three backgrounds in turn: f/Hz, level/dB
AIR_SPECTRA = [
    [(30, -9), (80, -10.5), (190, 1), (260, -18), (400, -15.5), (600, -21.5), (1000, -22.5), (1900, -25.5),
     (2800, -31.5), (7000, -43.5), (15800, -78)],
    [(40, -7), (80, -3.5), (125, 1.5), (195, -4), (320, -6), (500, -20), (650, -23.5), (1000, -16.5),
     (1300, -20), (2600, -30), (9000, -42), (15800, -96)],
    [(40, 3), (80, -10), (165, 1), (320, -5), (480, -13.5), (1450, -17), (2400, -23.5), (2900, -23),
     (5000, -30.5), (13000, -48), (15800, -85)],
]
# gain of each background: level/dB
AIR_DB = [-36.5, -31.5, -37]


def air():
    """Steady diffuse noise, coloured anew at each cut."""
    section = np.searchsorted(CUTS, np.arange(N) / SR)
    noise, out = port_noise(N), np.zeros((2, N))
    for k, (spectrum, db) in enumerate(zip(AIR_SPECTRA, AIR_DB)):
        present = uniform_filter1d((section == k) * 1., size=256)
        coloured = signal.oaconvolve(noise, body(spectrum)[None], axes=1)[:, :N]
        out += amp(db) * present * coloured
    return out


def movement(rise_s, hold_s, fall_s, sag_db_per_s, follow):
    """Loudness of one movement: a power of its speed, sagging as the pressure eases."""
    knots = np.cumsum([0, rise_s, hold_s, fall_s])
    t = np.arange(0, knots[-1], 1 / SR)
    speed = np.interp(t, knots, [0, 1, 1, 0])
    return speed ** follow * amp(-sag_db_per_s * np.maximum(t - knots[1], 0))


GRAIN_LOW_HZ, GRAIN_HIGH_HZ = 600, 11000  # lowest and highest pitch of a crumb


def slips(length, per_s, spread_db, hiss, cycles, size=256):
    """Tiny catches of random size over smooth hiss; given cycles, each rings as a crumb of its own pitch."""
    sizes = amp(spread_db * np.minimum(rng.exponential(1, length), 4.5)) * rng.choice([-1, 1], length)
    catches = sizes * (rng.random(length) < per_s / SR)
    if cycles:
        at, t = np.flatnonzero(catches)[:, None], np.arange(size) / SR
        hz = GRAIN_LOW_HZ * (GRAIN_HIGH_HZ / GRAIN_LOW_HZ) ** rng.random(length)[at]
        decay = np.exp(-hz * t / cycles)
        crumbs = catches[at] * hz * decay * np.sin(2 * np.pi * hz * t)
        places = (at + np.arange(size)).ravel()
        catches = np.bincount(places, crumbs.ravel(), length)[:length]
    return unit(unit(catches) + hiss * rng.standard_normal(length))


def rub(strokes, ring, per_s, spread_db, hiss, chatter_db, wet_db, left_db=0, sag_db_per_s=0, follow=1,
        cycles=0, level_column=4):
    """Slips under each stroke, gripped unevenly, ring a body in the room; left_db leans it to the left."""
    effort, out = np.zeros((1, N)), np.zeros((2, N))
    for row in strokes:
        loudness = movement(*row[1:4], sag_db_per_s, follow)
        add(effort, row[0], amp(row[level_column]) * loudness[None])
    # only the whole seconds that hold some effort are computed
    first_s, last_s = np.flatnonzero(effort[0])[[0, -1]] // SR
    busy = effort[0, first_s * SR:(last_s + 1) * SR]
    knots = np.arange(0, len(busy), .008 * SR)  # the grip changes every 8 ms
    knot_db = chatter_db * rng.uniform(-1.15, 1.2, len(knots))
    grip = unit(np.interp(np.arange(len(busy)), knots, amp(knot_db)))
    force = slips(len(busy), per_s, spread_db, hiss, cycles) * grip * busy
    add(out, first_s, room(force, ring, wet_db))
    return out * amp([[left_db / 2], [-left_db / 2]])


def strike(rows, ring, contact_s, rattle, wet_db, level_column=1, size=4096):
    """Each blow is one push and a brief dying chatter of the contact, ringing a body in the room."""
    out, t = np.zeros((2, N)), np.arange(size) / SR
    push = np.exp(-t * SR / 4) / 4  # dies within a few samples
    for row in rows:
        chatter = rng.standard_normal(size) * np.exp(-t / contact_s)
        sound = room(rattle * chatter / np.linalg.norm(chatter) + push, ring, wet_db)
        add(out, row[0], amp(row[level_column]) * sound / abs(sound.mean(0)).max())
    return out


def body(spectrum, modes=(), size=8192):
    """Causal impulse response, of energy 1, of a thing with this spectrum and these resonances."""
    hz = np.fft.rfftfreq(size, 1 / SR)
    peaks = sum(amp(db) ** 2 / (1 + (2 * (hz - f) / width) ** 2) for f, width, db in modes)
    log_gain = np.log(amp(read(spectrum, hz)) * np.sqrt(1 + peaks))
    # minimum phase, from the Hilbert transform of the log gain
    circle = np.concatenate([log_gain, log_gain[-2:0:-1]])
    response = np.fft.ifft(np.exp(np.conj(signal.hilbert(circle)))).real
    ring = response[:size // 2] * np.hanning(size)[size // 2:]
    return ring / np.linalg.norm(ring)


def wander(x, depth_db, size=512):
    """Drifts the colour of a sound in patches about a kilohertz wide and a twentieth of a second long."""
    z = signal.stft(x, nperseg=size)[2]
    patches = rng.standard_normal(z.shape[1:])
    for _ in range(2):
        patches = uniform_filter1d(uniform_filter1d(patches, size=9, axis=0), size=7, axis=1)
    gain = unit(amp(depth_db * unit(patches)))
    return signal.istft(z * gain, nperseg=size)[1][:, :N]


ROOM_T60 = 0.31  # how long the room rings, s


def room(force, ring, wet_db, early_db=-8, size=16384, count=7):
    """A force rings a body: heard directly, off nearby things, and as diffuse sound that swells and dies."""
    t = np.arange(size) / SR
    linger = np.exp(-2 * np.log(1000) * t / ROOM_T60) * (1 - np.exp(-t / 0.0049))
    power = abs(signal.fftconvolve(force ** 2, linger / linger.sum()))
    paths = (t == 0) * 1.
    delays = np.round(rng.uniform(.002, .028, count) * SR).astype(int)
    echoes = unit(1 / np.sqrt(delays)) * rng.choice([-1, 1], count) / np.sqrt(count)
    paths[delays] = amp(early_db) * echoes
    diffuse = amp(wet_db) * np.sqrt(power) * port_noise(len(power))
    sound = signal.fftconvolve(force, paths) + diffuse
    loudness = np.hypot(np.linalg.norm(paths), amp(wet_db))
    return signal.fftconvolve(sound, ring[None], axes=1) / loudness


# likeness of diffuse sound at the two microphone ports: f/Hz, correlation (0-1)
LIKENESS = [(30, .7), (70, .78), (140, .93), (280, .94), (600, .8), (1400, .8), (3000, .5), (7000, .28),
            (15000, .3)]


def port_noise(size):
    """Diffuse white noise at two close ports: most alike around 140-280 Hz, less in deep bass and treble."""
    padded = next_fast_len(size)
    a, b = rfft(rng.standard_normal((2, padded)))
    like = np.clip(read(LIKENESS, np.linspace(0, SR / 2, len(a))), 0, 1)
    mid, side = a * np.sqrt((1 + like) / 2), b * np.sqrt((1 - like) / 2)
    return irfft([mid + side, mid - side], padded)[:, :size]


def amp(db):
    """Decibels to gain."""
    return 10 ** (np.asarray(db) / 20)


def unit(x):
    """Scales to rms 1."""
    return x / np.sqrt(np.mean(x ** 2) + 1e-20)


def read(points, hz):
    """Reads a table on a log-frequency axis."""
    f, value = np.transpose(points)
    return np.interp(np.log(hz + 1), np.log(f + 1), value)


def add(mix, s, sound):
    """Mixes a sound in at time s, in seconds."""
    part = mix[:, max(round(s * SR), 0):][:, :sound.shape[1]]
    part += sound[:, :part.shape[1]]


def scene():
    """All the work in the one room; the second cut stops the brushing dead."""
    before_cut = uniform_filter1d((np.arange(N) / SR < CUTS[1]) * 1., size=128)
    sweeping = broom() + flicks() + dustpan() + pan_squeals() + hand_brush() + offcut()
    emptying = sawdust_pour() + rim_raps() + bin_lid() + sleeve()
    return before_cut * sweeping + emptying + floorboards() + faint_hiss() + air()


# how much more the left port hears than the right: f/Hz, level/dB
PORT_BALANCE = [(30, -1.8), (60, -1.5), (125, -.5), (500, -1.1), (1000, -.6), (4000, 1.2), (8000, -1.5),
                (15000, -1.5)]
# how far the left port lags the right: f/Hz, phase/rad
PORT_LAG = [(30, 0), (500, .02), (1000, .09), (1900, .24), (3200, .42), (5000, .42), (7500, .1), (15000, 0)]
EDGE_HZ = 15600  # top of the band


def record(dry):
    """Two slightly unlike microphone ports, a very fast limiter on the loudest peaks, and the band limit."""
    hz = np.fft.rfftfreq(N, 1 / SR)
    half = amp(read(PORT_BALANCE, hz) / 2) * np.exp(-.5j * read(PORT_LAG, hz))
    heard = irfft(rfft(dry) * np.array([half, 1 / half]), N)
    gain = np.minimum(1, .98 / (abs(heard) + 1e-9))
    limited = heard * uniform_filter1d(minimum_filter1d(gain, size=5), size=5)
    low_pass = signal.firwin(255, EDGE_HZ, window=("kaiser", 8), fs=SR)
    return signal.oaconvolve(limited, low_pass[None], "same")


dry = scene()
out = record(dry)
file_out(out)
```